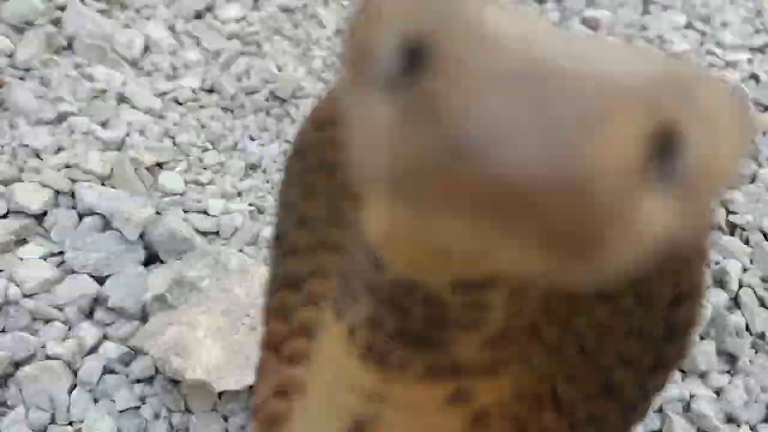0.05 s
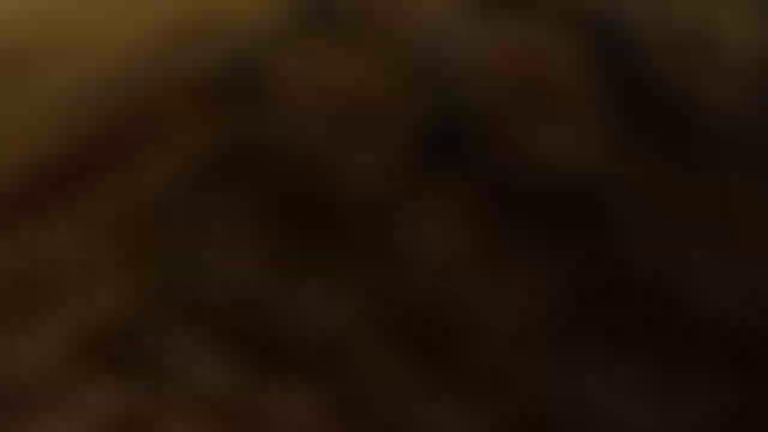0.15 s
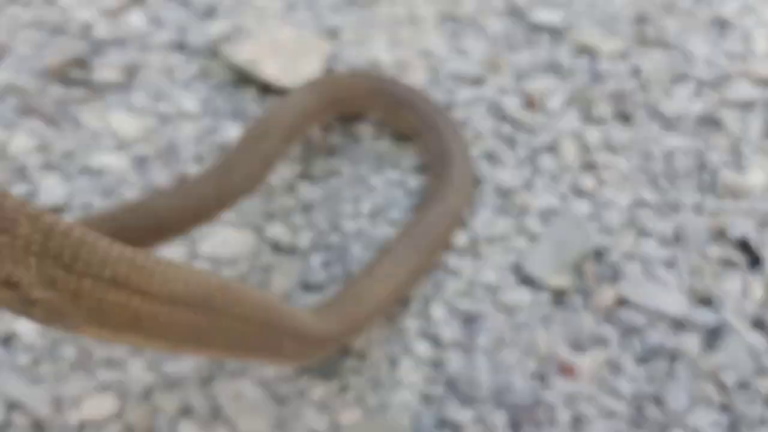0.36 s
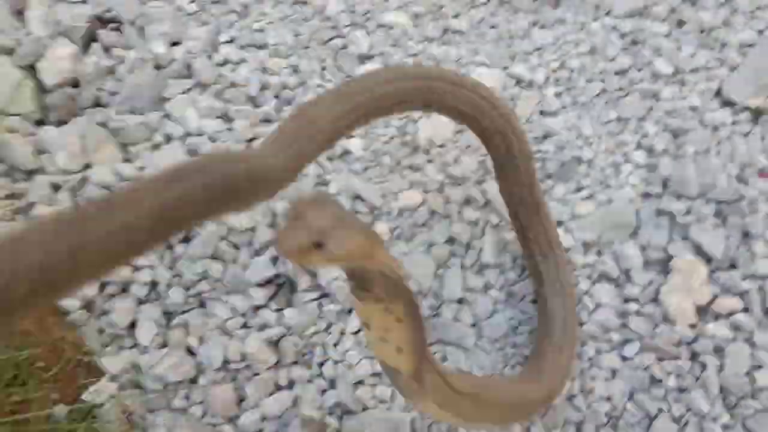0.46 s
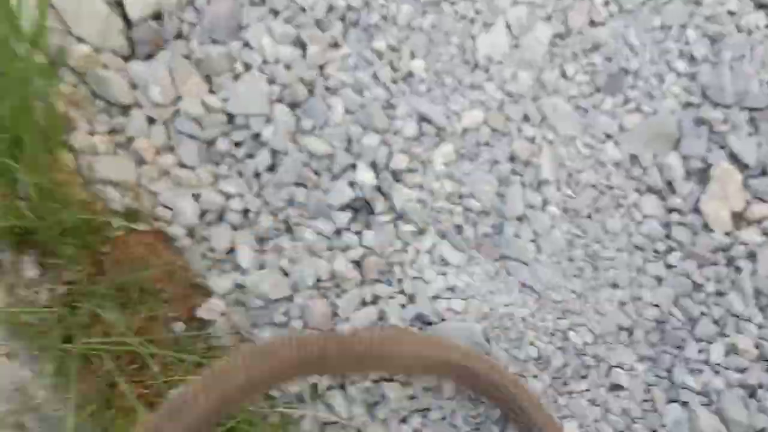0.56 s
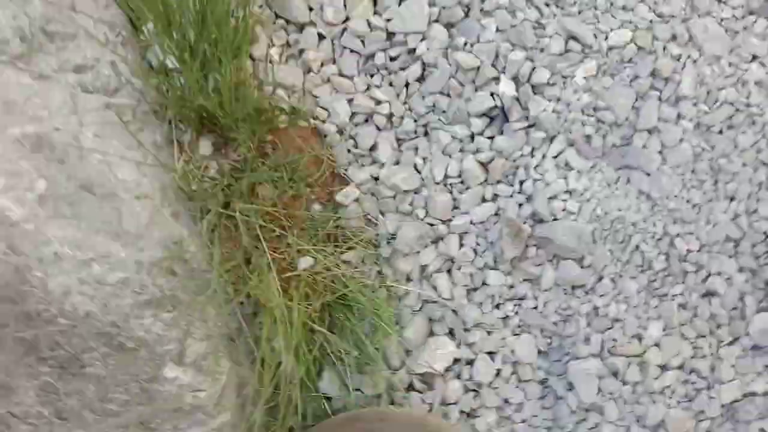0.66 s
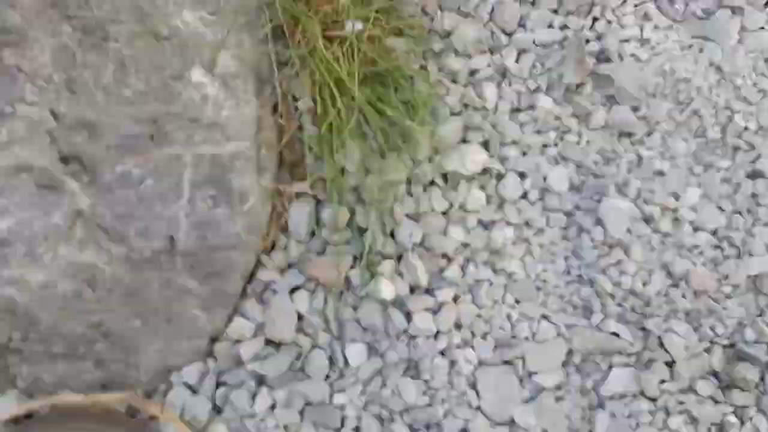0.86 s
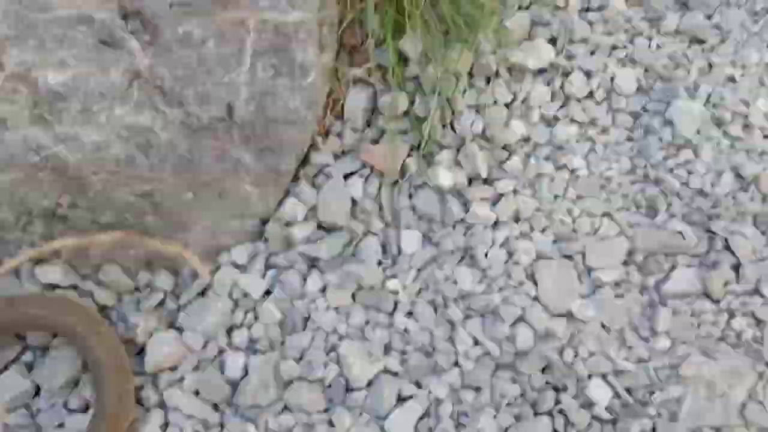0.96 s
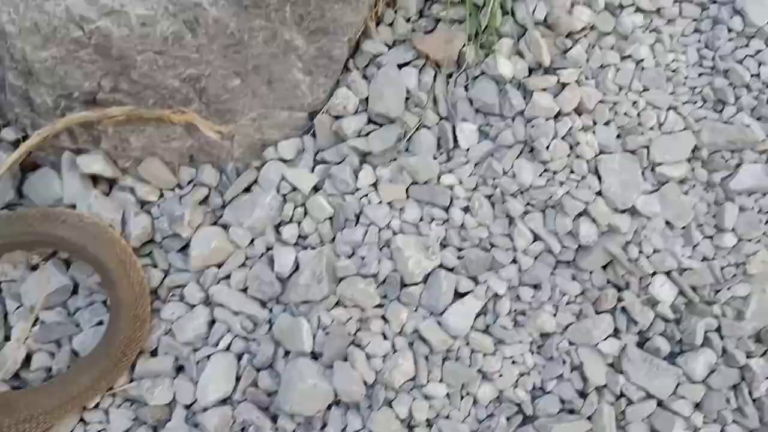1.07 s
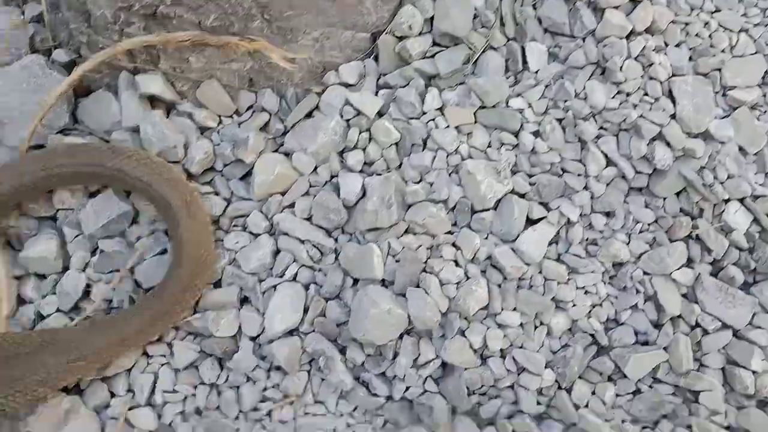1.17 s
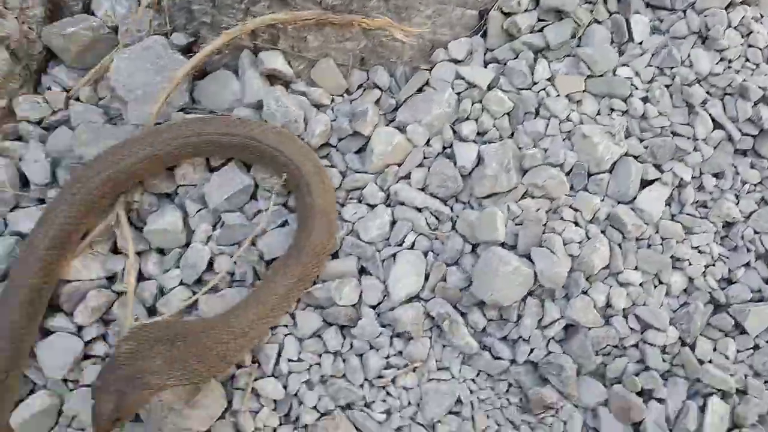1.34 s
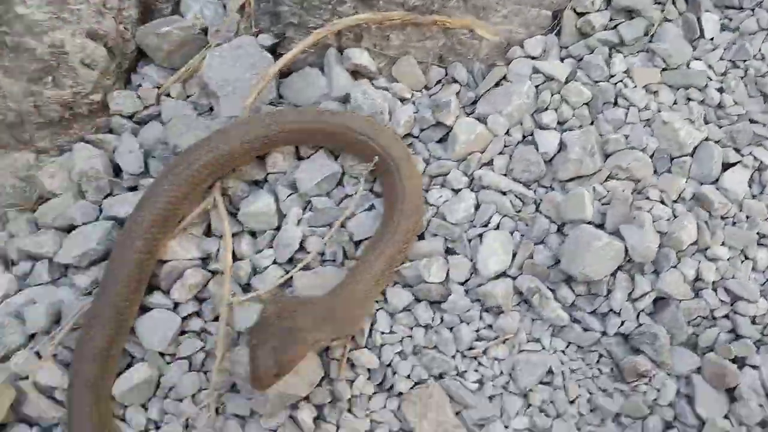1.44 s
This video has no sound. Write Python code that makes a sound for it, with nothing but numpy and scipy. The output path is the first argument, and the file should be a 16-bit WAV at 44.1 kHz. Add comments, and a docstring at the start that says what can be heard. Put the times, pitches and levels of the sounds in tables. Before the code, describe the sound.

A cobra's hiss swells into a harsh blast right at the microphone and ends in a short spit. Then loose stones click and gravel crunches, with low puffs of air on the moving microphone and a soft outdoor rustle.

```python
"""Outdoors on stony ground, a cobra hisses and lunges at a hand-held camera.
Air forced through its throat swells to a harsh blast close to the right microphone,
ends in a short spit and sinks away. Gravel crunches, loose stones click together,
and the hurried movement puffs air against the microphones over a soft outdoor rustle."""
import sys
import numpy as np
from scipy import signal
from scipy.fft import rfft, irfft
from scipy.io import wavfile
from scipy.ndimage import uniform_filter1d

SR = 44100
rng = np.random.default_rng(int(sys.argv[2]) if len(sys.argv) > 2 else 0)


def materialize(psi):
    """Save the field psi as 16-bit PCM at rate SR to the path in sys.argv[1].

    A 1-D psi becomes a single channel; in a 2-D psi each row is a channel.
    """
    bounded = np.clip(np.atleast_2d(psi).T, -1, 1)
    quanta = np.round(bounded * 32767).astype(np.int16)
    wavfile.write(sys.argv[1], SR, quanta)


N = 66150
T, HZ = np.arange(N) / SR, np.fft.rfftfreq(N, 1 / SR)


def amp(db):
    """Turns decibels into a gain."""
    return 10 ** (np.asarray(db) / 20)


def unit(x):
    """Scales a signal to an average (rms) size of 1."""
    return x / np.sqrt(np.mean(x ** 2) + 1e-20)


def over_pitch(table):
    """Joins a table's rows into a curve over frequency."""
    hz, value = np.transpose(table)
    return np.interp(np.log(HZ + 1), np.log(hz), value)


def over_time(table):
    """Gives a curve over time for each column after the first."""
    times, *columns = np.transpose(table)
    return [np.interp(T, times, column) for column in columns]


def pan(db):
    """Left and right gains for a balance in dB: plus is left, minus is right."""
    gains = amp(np.atleast_1d(db) * np.array([[.5], [-.5]]))
    return gains / np.sqrt((gains ** 2).mean(0))


def add(mix, start, sound):
    """Mixes a sound in at a start time in seconds."""
    part = mix[:, max(round(start * SR), 0):][:, :sound.shape[-1]]
    part += sound[..., :part.shape[1]]


def white():
    """Two unrelated noises."""
    return rng.standard_normal((2, N))


def flutter(depth, rate_hz):
    """The random wobble of flowing air, as a gain."""
    wobble = unit(irfft(rfft(rng.standard_normal(N)) * HZ / (1 + (HZ / rate_hz) ** 4), N))
    return unit(np.exp(depth * wobble))


def rings(table):
    """The power at each frequency of a set of ringing peaks."""
    return sum(amp(db) ** 2 / (1 + 2 * ((HZ - hz) / width) ** 2) ** 2 for hz, width, db in table)


def resonate(x, hz, width_hz):
    """Makes a sound ring at a moving pitch."""
    turn = np.exp(2j * np.pi * np.cumsum(hz) / SR)
    decay = np.exp(-np.pi * width_hz / SR)
    return 2 * (turn * signal.lfilter([1 - decay], [1, -decay], x / turn)).real


# How alike both sides are for near and far sounds. Each row: frequency in Hz, likeness from 0 to 1.
NEAR_LIKENESS = [(100, 1), (700, 0.92), (2500, 1), (4500, 0.47), (7000, 0.19), (15000, 0.17)]
FAR_LIKENESS = [(60, 0.41), (300, 0.97), (800, 0.78), (1600, 0.41), (4000, 0.13), (9000, 0.58)]
def stereo(noises, tone, likeness, left_lag_s=0):
    """Shapes the tone of two noises and makes them partly alike, as at two microphones."""
    shared, other = rfft(noises)
    alike = np.clip(over_pitch(likeness), 0, 1)
    left = shared * np.exp(-2j * np.pi * HZ * left_lag_s)
    right = alike * shared + np.sqrt(1 - alike ** 2) * other
    return unit(irfft(np.array([left, right]) * tone, N))


# The rustle's tone. Each row: frequency in Hz, level in dB.
AIR_TONE = [(25, -17), (70, 3), (200, -1.5), (330, -4.5), (560, 1.5), (1000, 0), (1500, -7.5), (1950, 7),
            (2200, 0.5), (2700, 1.5), (4500, -13), (6500, -10), (8200, -41), (15000, -58)]
# Where it sits. Each row: frequency in Hz, balance in dB.
AIR_BALANCE = [(100, -2.5), (1000, -1.5), (2100, 15), (4000, -0.5), (9000, 11)]
# How it swells. Each row: time in seconds, level in dB.
AIR_SWELL = [(0, -73), (.66, -40), (.76, -36), (.86, -48.5), (1.02, -57.5), (1.12, -47), (1.2, -45.5),
             (1.33, -40.5), (1.5, -46.5)]
def outdoor_air():
    """A soft outdoor rustle swells and sinks."""
    tone = amp(over_pitch(AIR_TONE)) * pan(over_pitch(AIR_BALANCE))
    rustle = stereo(white(), tone, FAR_LIKENESS)
    return rustle * amp(over_time(AIR_SWELL)[0]) * flutter(depth=0.2, rate_hz=18)


# Puffs of air. Each row: start in seconds, level in dB, pitch in Hz, seconds to fade 60 dB, balance in dB.
AIR_PUFFS = [(0.367, -26.5, 118, 0.096, -17), (0.486, -29, 74, .2, -13), (0.526, -28.5, 107.6, 0.16, -26),
             (0.767, -37, 181, 0.15, -5), (.812, -24, 102, 0.048, -25), (.935, -39.5, 100, .08, -9),
             (0.983, -25, 93, 0.11, 21), (1.016, -35.5, 132, 0.22, 15), (1.101, -38, 72, 0.14, 20),
             (1.16, -26.5, 205, 0.033, -3), (1.275, -31, 221, 0.14, -2.5), (1.33, -22, 117.3, 0.1, -33),
             (1.374, -30, 111.4, 0.19, -20), (1.486, -25, 87.4, 0.054, -27)]
def puffs():
    """Air hits the moving microphones in low, lumpy thumps."""
    out, t = np.zeros((2, N)), T[:12000]
    rise_s, roughness, top_hz = 0.0032, 0.46, 286
    for start, db, hz, fade_s, balance in AIR_PUFFS:
        band = signal.butter(2, [hz / 2, hz * 2], "band", fs=SR, output="sos")
        lumps = unit(signal.sosfilt(band, white()))[:, -len(t):]
        thump = np.sin(2 * np.pi * hz * t) + roughness * lumps
        level = np.minimum(t / rise_s, 1) * amp(db - 60 * t / fade_s)
        add(out, start, thump * level * pan(balance))
    return signal.sosfilt(signal.butter(4, top_hz, fs=SR, output="sos"), out)


def grains(per_second=5000, spread_db=3.5):
    """Many tiny hits of uneven size."""
    size = amp(spread_db * np.minimum(rng.exponential(1, (2, N)), 4))
    return np.sign(white()) * size * (rng.random((2, N)) < per_second / SR)


# Gravel shifting. Each row: start in seconds, length in seconds, level in dB,
# grit in dB above the crunch, seconds to fade 60 dB.
GRAVEL_SHIFTS = [(0.709, 0.017, -30, 1, 0.12), (.872, 0.029, -44, 2.5, 0.059), (0.929, .014, -48, 6, 0.13),
                 (1.036, 0.015, -38, -10, 0.034), (1.151, 0.0063, -36, -7, 0.04),
                 (1.222, 0.054, -30.5, -7.5, 0.16), (1.342, 0.0058, -37, -10, 0.21),
                 (1.421, 0.018, -42, -8.5, 0.2)]
# The tones of the crunch and the grit. Each row: frequency in Hz, level in dB.
CRUNCH_TONE = [(60, -32), (150, -19), (230, -5.5), (350, -12), (580, 3), (800, -8), (1200, -13.5),
               (2200, -6.5), (4000, -19.5), (8000, -71)]
GRIT_TONE = [(500, -34), (1400, -18), (2000, 2.5), (2600, -5), (3500, -9), (4600, -0.5), (6400, 1.5),
             (7300, -8), (8500, -20), (15000, -37)]
def gravel(rise_s=0.016):
    """Gravel gives way under weight: a dull crunch with bright grit on top."""
    crunch_level, grit_level = np.zeros((2, N))
    for start, length, db, grit_db, fade_s in GRAVEL_SHIFTS:
        fade_db = 60 * np.maximum(T - start - length, 0) / fade_s
        push = np.clip((T - start) / rise_s, 0, 1) * amp(db - fade_db)
        crunch_level += push
        grit_level += push * amp(grit_db)
    crunch = stereo(grains(), amp(over_pitch(CRUNCH_TONE)), FAR_LIKENESS, left_lag_s=.00007)
    grit = stereo(grains(), amp(over_pitch(GRIT_TONE)) * pan(3.9), FAR_LIKENESS, left_lag_s=.00005)
    return crunch_level * crunch + grit_level * grit


# Stones knocking. Each row: start in seconds, level in dB, pitch in Hz,
# microphone ring in dB above that level, balance in dB.
STONE_KNOCKS = [(.5446, -10, 4300, -13, -1), (0.5484, -18.5, 2900, -12, 13), (0.8477, -32, 3180, 1, -3),
                (.8737, -20, 2700, 3, 6), (0.874, -22, 3120, 4, 7), (0.8752, -20.5, 2550, 5, -24),
                (.8812, -25, 3200, -5, -6), (.8900, -9, 3600, 4, 12), (.8925, -16.5, 2790, 0, -14),
                (.9018, -25.5, 3060, -1, -8), (.9245, -33, 3380, 12, 1), (.9310, -33.5, 2480, 7, 8),
                (.9480, -34, 3700, 5, 2), (.9695, -27.5, 4470, 1.5, 2), (.9995, -27, 3700, -5.5, 7),
                (1.0130, -32, 5330, -5, -3), (1.0323, -25.5, 5700, -3, -3), (1.0507, -36, 2150, -13, 8),
                (1.0722, -37, 2680, 12, 14), (1.1003, -14, 4280, 0.5, 2.5), (1.1260, -20, 4970, -22, -4),
                (1.1424, -23.5, 2880, -22, 20), (1.1635, -36, 3100, -14, -6), (1.2335, -28, 4070, 3.5, 6),
                (1.3135, -21.5, 2900, -8, 6)]
# The notes in a stone's ring. Each row: multiple of its pitch, level in dB.
STONE_NOTES = [(.66, -29), (1, 2), (1.22, -1.5)]
def stones():
    """Stones click with a brief crack and ring, setting off a short, high microphone ring."""
    out, t = np.zeros((2, N)), T[:1024]
    ring_s, mic_s, crack_s = 0.004, 0.0058, 0.0047  # times to fade 60 dB
    contact_s = .00018
    onset = 1 - np.exp(-t / contact_s)
    for start, db, hz, mic_db, balance in STONE_KNOCKS:
        age = np.maximum(t - rng.uniform(0, .00008, (2, 1)), 0)  # each side has its own tiny delay
        ring = sum(amp(note_db) * np.sin(2 * np.pi * hz * k * age) for k, note_db in STONE_NOTES)
        ring *= amp(-60 * age / ring_s)
        mic_hz = 6710 * rng.uniform(0.89, 1.04)
        mic_ring = np.sin(2 * np.pi * mic_hz * age) * amp(mic_db - 60 * age / mic_s)
        crack = rng.standard_normal((2, len(t))) * amp(0.5 + 0.49 * mic_db - 60 * t / crack_s)
        add(out, start, (ring + mic_ring + crack) * onset * amp(db) * pan(balance))
    body = signal.sosfilt(signal.butter(6, [1400, 7400], "band", fs=SR, output="sos"), out)
    return body + amp(-24) * out


def ground_echo(x, level_db=-9, fade_s=0.11):
    """Sound bounces off the stony ground in a short, blurred echo."""
    tail = rng.standard_normal((2, 6000)) * amp(-60 * T[:6000] / fade_s)
    return amp(level_db) * signal.fftconvolve(x, tail / np.linalg.norm(tail[0]), axes=1)[:, :N]


# The snake's breath. Each row: time in seconds, thin hiss in dB, hollow part in dB,
# balance in dB (halved for the thin hiss).
HISS_SWELL = [(0, -41, -38, -3), (.1, -37.5, -39, -4.5), (.18, -36, -34, -9), (.214, -30, -27.5, -11),
              (.25, -33, -30, -8), (.42, -19.5, -29, -10), (.53, -30.5, -33, -2), (.575, -34.5, -36.5, 1),
              (.65, -33.5, -39.5, -1.5), (.695, -41, -45, -1.5), (.77, -38.5, -39.5, -1),
              (.84, -47, -56, 1), (.96, -47.5, -59.5, 4), (1.05, -55.5, -95, -1)]
# The tones of the two parts. Each row: frequency in Hz, level in dB.
THIN_TONE = [(500, -29), (1000, -3), (1500, -5.5), (2100, -3), (2800, -0.5), (3800, -4.5), (4900, -8),
             (6500, 2.5), (7200, -7.5), (8100, -20.5), (12500, -25.5), (15200, -17)]
HOLLOW_TONE = [(50, -29), (130, -8), (230, 1.5), (420, 3.5), (560, -0.5), (760, 0.5), (1100, -11.5),
               (2000, -57)]
# Ringing peaks in the thin hiss. Each row: pitch in Hz, width in Hz, level in dB.
THIN_RINGS = [(1320, 230, 0), (2050, 120, 3.5), (2770, 61, 4), (3560, 420, -1), (6520, 220, -9.5)]
# Where the thin hiss sits. Each row: frequency in Hz, balance in dB.
THIN_BALANCE = [(1000, 0), (4000, 1), (5100, -12), (6000, 0.5), (6700, 8.5), (15000, 5)]
def steady_hiss():
    """Air forced through the opening of the snake's windpipe: a thin hiss over a hollow one."""
    thin_db, hollow_db, balance = over_time(HISS_SWELL)
    tone = np.sqrt(amp(over_pitch(THIN_TONE)) ** 2 + rings(THIN_RINGS)) * pan(over_pitch(THIN_BALANCE))
    thin = stereo(white(), tone, FAR_LIKENESS, left_lag_s=0.00021)
    hollow = stereo(white(), amp(over_pitch(HOLLOW_TONE)), FAR_LIKENESS, left_lag_s=0.000042)
    breath = thin * amp(thin_db) * pan(.5 * balance) + hollow * amp(hollow_db) * pan(balance)
    return breath * flutter(depth=0.15, rate_hz=145)


def spit(hz=6470, width_hz=1100, level_db=-29.5, peak_s=.503, span_s=.013):
    """The blast ends in a short, high spurt."""
    spurt = stereo(white(), rings([(hz, width_hz, 0)]) * pan(5.2), NEAR_LIKENESS)
    return spurt * amp(level_db) * np.exp(-((T - peak_s) / span_s) ** 2)


def mic_sizzle(sides, hz=14600, width_hz=810, peak_s=0.32, span_s=0.16):
    """A fine, very high sizzle: the left microphone rings during the blast."""
    fizz = stereo(white(), np.sqrt(rings([(hz, width_hz, 0)])) * sides, NEAR_LIKENESS)
    return fizz * np.exp(-((T - peak_s) / span_s) ** 2)


# The broad rush of air. Each row: frequency in Hz, level in dB.
RUSH_TONE = [(30, -42), (120, -13.5), (300, -3.5), (1100, -2), (3000, -13.5), (5000, -15.5), (6900, -22),
             (8000, -34.5), (12500, -41), (16000, -42)]
# The ringing of throat and neck. Each row: pitch in Hz, width in Hz, level in dB.
THROAT_RINGS = [(290, 100, -6), (520, 180, 0), (740, 220, -3), (1350, 200, -8), (2060, 160, -3),
                (3680, 200, -5), (4150, 220, -5), (5600, 500, -11), (6380, 330, -7)]
# The mouth's ring falls as the jaws close. Each row: time in seconds, pitch in Hz, level in dB.
MOUTH_GLIDE = [(.27, 2650, -7.5), (.32, 2460, -3.5), (.37, 2470, -4.5), (.43, 2170, -9), (.47, 2030, -0.5),
               (.52, 2100, -2.5)]
# Where the blast sits. Each row: frequency in Hz, balance in dB.
BLAST_BALANCE = [(100, -32), (500, -10), (1150, -10), (1600, -1), (2600, 1), (4800, -3), (6500, 3.5),
                 (11000, -6), (14500, 18)]
def blast(level_db=-15, full_s=0.2812, release_s=0.44, left_lag_s=0.000437):
    """The lunge: a fluttering jet of air rings the throat and closing mouth, right at the microphone."""
    sides = pan(over_pitch(BLAST_BALANCE))
    wobble = flutter(depth=.12, rate_hz=170)
    throat_tone = np.sqrt(amp(over_pitch(RUSH_TONE)) ** 2 + rings(THROAT_RINGS))
    throat = stereo(white() * wobble, throat_tone * sides, NEAR_LIKENESS, left_lag_s)
    jet = stereo(white() * wobble, sides, NEAR_LIKENESS, left_lag_s)
    mouth_hz, mouth_db = over_time(MOUTH_GLIDE)
    mouth = resonate(jet, mouth_hz, width_hz=820)
    mouth = unit(resonate(mouth, mouth_hz, width_hz=820))  # a second pass sharpens the ring
    hiss = amp(-2.5) * throat + amp(mouth_db) * mouth + amp(-19.5) * mic_sizzle(sides)
    rise, sag, release = 544, 7.5, 199  # dB per second
    drop_db = (rise * np.maximum(full_s - T, 0)
               + sag * np.maximum(T - full_s, 0)
               + release * np.maximum(T - release_s, 0))
    return hiss * amp(level_db - drop_db)


def shimmer(x, depth_db=2.61, patch_hz=301.2, patch_s=0.047):
    """The tone of a hiss shifts in small random patches."""
    spectrum = signal.stft(x, nperseg=512, noverlap=384)[2]
    patches = uniform_filter1d(rng.standard_normal(spectrum.shape[1:]), round(patch_hz * 512 / SR), 0)
    patches = unit(uniform_filter1d(patches, round(patch_s * SR / 128), 1))
    return signal.istft(spectrum * amp(depth_db * patches), nperseg=512, noverlap=384)[1][:, :N]


def scene():
    """The snake, stones, gravel and moving air together."""
    knocks = stones()
    hiss_and_air = shimmer(steady_hiss() + blast() + spit() + outdoor_air())
    return hiss_and_air + knocks + ground_echo(knocks) + gravel() + puffs()


def record(dry):
    """The recorder cuts deep rumble, rounds off loud peaks and drops the highest treble."""
    low_cut_hz, ceiling, top_hz = 49, .88, 15900
    thinned = signal.sosfilt(signal.butter(2, low_cut_hz, "high", fs=SR, output="sos"), dry)
    rounded = thinned / (1 + (thinned / ceiling) ** 10) ** (1 / 10)
    treble_cut = signal.firwin(401, top_hz, window=("kaiser", 9), fs=SR)
    return signal.oaconvolve(rounded, treble_cut[None], "same")


dry = scene()
out = record(dry)
materialize(out)
```